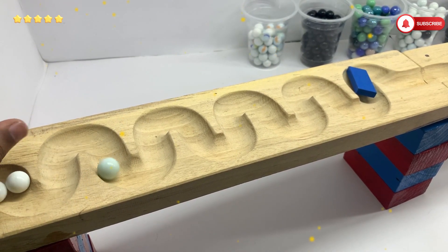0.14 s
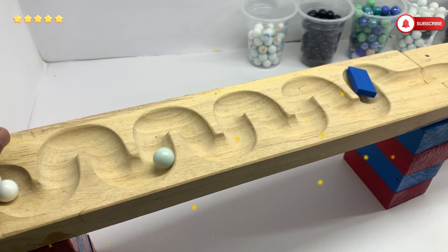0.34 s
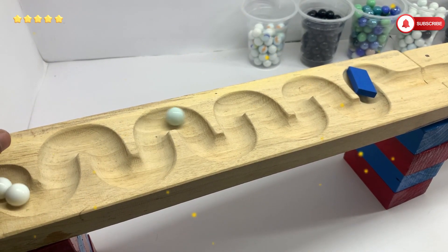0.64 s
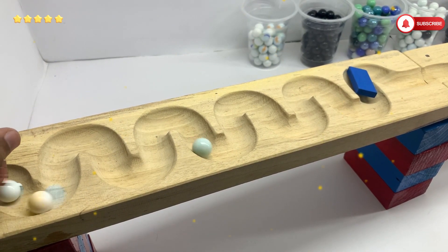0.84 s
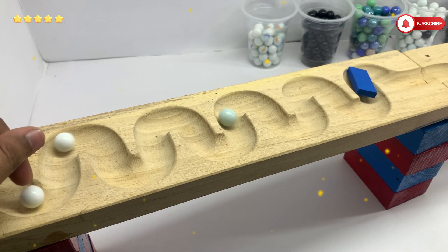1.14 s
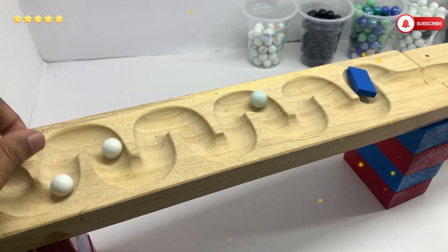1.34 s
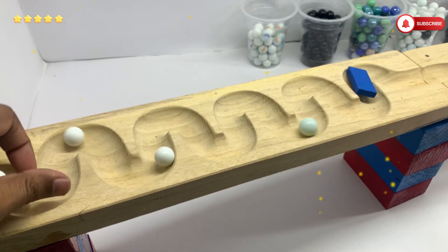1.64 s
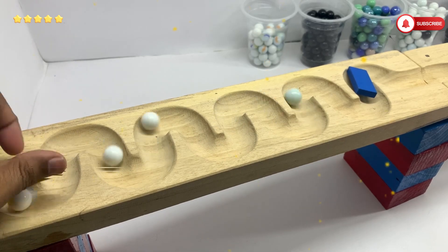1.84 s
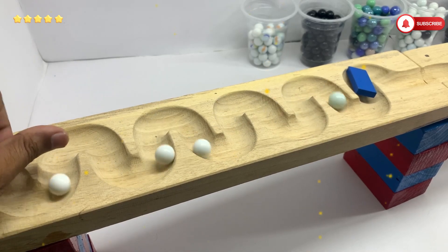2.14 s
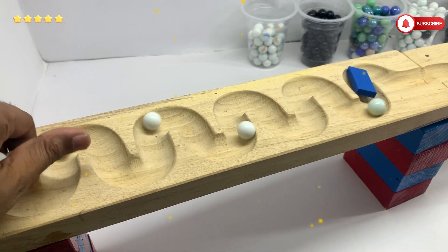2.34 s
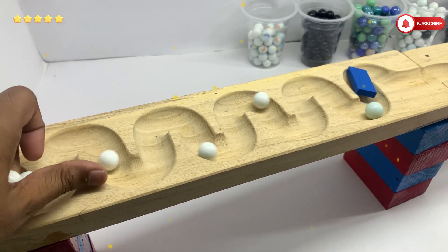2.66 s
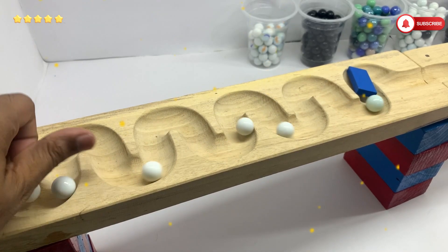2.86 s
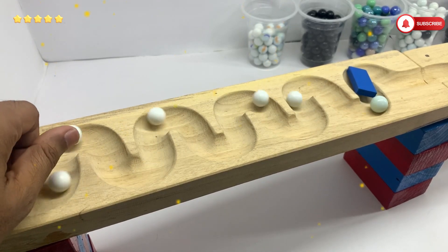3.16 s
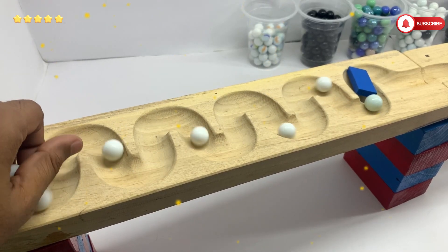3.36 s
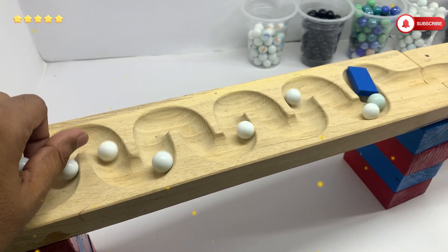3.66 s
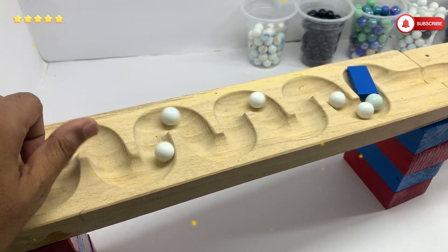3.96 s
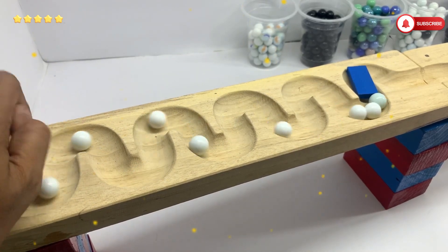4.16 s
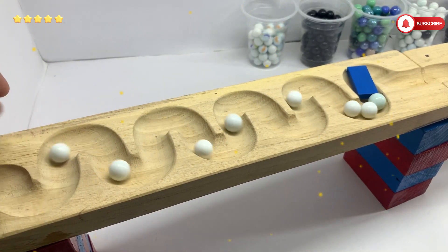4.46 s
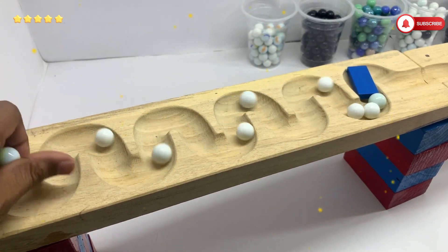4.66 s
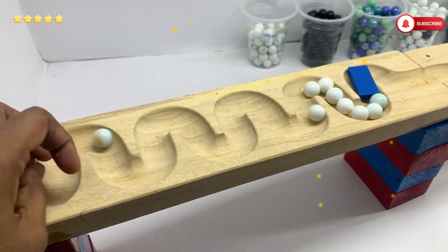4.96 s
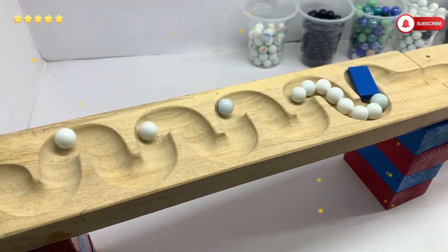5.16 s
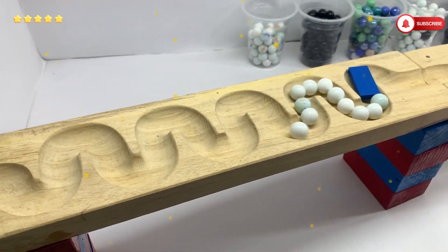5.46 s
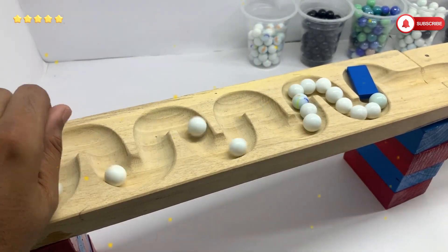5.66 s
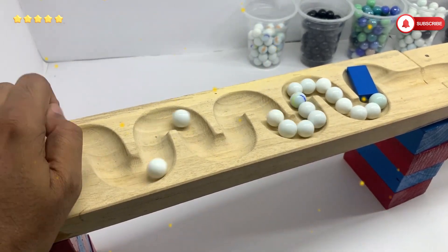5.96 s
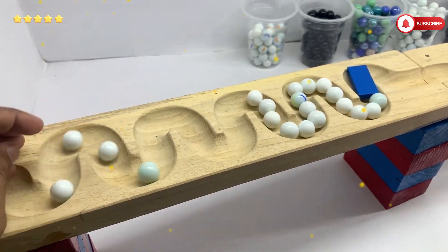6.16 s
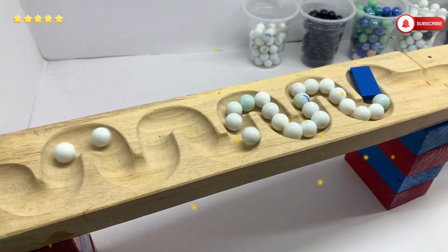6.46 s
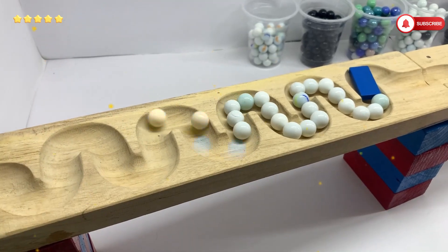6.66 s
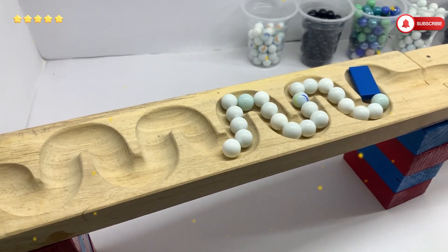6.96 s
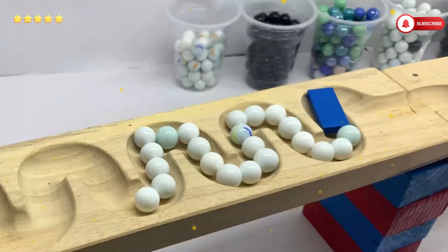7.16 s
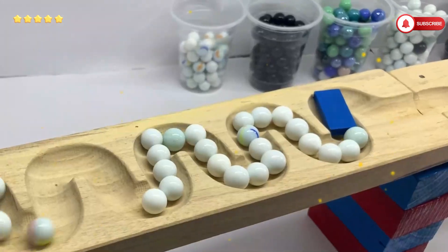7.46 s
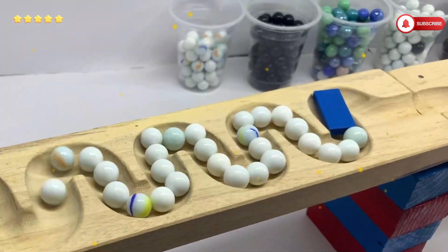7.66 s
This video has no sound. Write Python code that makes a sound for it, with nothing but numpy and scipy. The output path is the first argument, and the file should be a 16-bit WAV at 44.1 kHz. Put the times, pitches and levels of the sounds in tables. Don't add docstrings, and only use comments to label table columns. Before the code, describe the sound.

Close indoor rolling of glass marbles on a ringing wooden plank, bumping bends and clacking together, abruptly turning into fast, thin, crowded clicking.

```python
import sys
import numpy as np
from scipy import signal
from scipy.fft import rfft, irfft
from scipy.io import wavfile
from scipy.ndimage import uniform_filter1d

SR = 44100
rng = np.random.default_rng(int(sys.argv[2]) if len(sys.argv) > 2 else 0)


def field_ratio(decibels):
    return 10 ** (np.asarray(decibels, dtype=float) / 20)


def wav_record(signal):
    frames = np.transpose(np.atleast_2d(signal))
    bounded = np.clip(frames, -1, 1)
    quanta = np.round(bounded * 32767).astype(np.int16)
    wavfile.write(sys.argv[1], SR, quanta)


N = 344348

HURRY_S, SECOND_HURRY_S = 4.725, 5.535
EARLY_SPEEDUP, SPEEDUP = 3.45, 2.96
WANDER_DB = 2.6

# (pitch [Hz], width [Hz], level [dB])
RUMBLE = [(58, 25, -11), (93.5, 5.7, 0), (133.3, 104, 1.5), (170.7, 18.4, 3), (223.6, 33, -2.5),
          (262, 39, 1.5), (327.3, 40, -2)]
# (pitch [Hz], width [Hz], level [dB])
BODY = [(508, 25, -1.5), (620, 86, 0.5), (839, 49, -1.2), (955.3, 46, -1.4), (1083, 83, -6),
        (1231, 96, -1.3), (1400, 85, -0.5), (1565, 22, 2)]
# (pitch [Hz], width [Hz], level [dB])
RING = [(1971, 80, 2.5), (2176, 38, 2.5), (2353, 75, -1), (2536, 51, -4)]
# (pitch [Hz], width [Hz], level [dB])
SHEEN = [(2940, 72, 7), (3250, 30, 0), (3640, 60, -6), (3850, 72, -7), (4040, 36, -5), (4520, 60, -6),
         (5100, 45, -7)]
SHOT_ENDS_S = [
    .545,
    1.612,
    2.742,
    3.67,
    4.74,
    6.735,
    7.178,
    7.328,
    8,
]
# (time [s], peak [dB], lower part [dB])
FAST_CLICKS = [(4.7125, -12, -19), (4.7177, -12, -22), (4.7253, -8, -23), (4.7667, -10.5, -8),
               (4.8043, -13.5, -7), (4.8289, -3, -8), (4.883, -13.5, -10), (4.9166, -7.5, -6.5),
               (4.9483, -21, 5), (4.949, -19.5, -7), (4.9676, -20, -3), (5.0067, -2, -25),
               (5.0496, -17.5, -5), (5.1005, -26, 2), (5.1586, -9, -16), (5.1773, 1, -23),
               (5.2756, -9.5, -1), (5.3423, -14, -4), (5.348, -9, -6), (5.3833, -3.5, -2.5),
               (5.4316, -3, -6), (5.4617, -12, -19), (5.4896, -23, -5), (5.504, -15, -12),
               (5.5146, -9, -26), (5.5315, -12, -25), (5.5315, -3, -31), (5.5963, -3.5, -16),
               (5.628, -3, -16.5), (5.6566, -4, -15), (5.6929, -6.5, -7), (5.727, -0.5, -20),
               (5.789, -2.5, -9.5), (5.8198, -13, -5), (5.8205, -6, -7), (5.8388, -6, -16),
               (5.8542, -2, -23), (5.9175, -7, -5.5), (5.959, -7, -8), (5.967, -15, -13), (5.967, -5, -26),
               (5.99, -6, -19), (6.0406, -24, 2.5), (6.078, -6, -11), (6.0997, -8, -9), (6.106, -6, -12),
               (6.1237, -12, -15), (6.1303, -7, -20)]
# (time [s], peak [dB], lower part [dB])
LAST_CLICKS = [(6.1735, -13, -11), (6.1912, -10, -13), (6.239, -12, -5), (6.2677, -2.5, -5.5),
               (6.329, -4, -32), (6.3853, -17, -5), (6.3853, -2, -15), (6.4137, -3, -9), (6.4466, -8, 0),
               (6.4792, -3, -5), (6.5007, -5, 0), (6.568, -6, -14), (6.6493, -3, -8), (6.6868, -2.5, -8),
               (6.716, -4.5, -20), (6.7673, -19, -31), (6.8123, -30, -14), (6.8123, -14, -38.5),
               (6.8622, -27, -15), (6.8782, -2.5, -19), (6.932, -20, -10), (6.95, -23, -13),
               (6.9985, -25, 1), (7.0303, -15, -0.5), (7.08, -1.5, -18), (7.1226, -5, -29),
               (7.1413, -3.5, -20), (7.1675, -11, -10), (7.1675, -1.5, -12.5), (7.2101, 2, -25),
               (7.2508, -3, -17), (7.2688, -7, -22), (7.297, -21, -20), (7.295, -3.5, -16),
               (7.3467, 0, -25), (7.374, 3, -27), (7.4329, -24, 5), (7.432, -12, -12), (7.4569, -14, -4),
               (7.4707, -7, -16), (7.5107, -10, -5), (7.5584, -7.5, -5), (7.5888, -9, -4),
               (7.6107, -12, -10), (7.623, -3.5, -10), (7.6656, -13, -12), (7.6762, -12, -17),
               (7.7122, -7.5, -8), (7.7514, -11.5, -18)]


def unit(x):
    return x / np.sqrt(np.mean(x ** 2))


def colour(x, spectrum, extra_db=0):
    hz, db = np.transpose(spectrum)
    bins = np.fft.rfftfreq(x.shape[-1], 1 / SR)
    gain_db = np.interp(np.log(bins + 1), np.log(hz), db, left=-90, right=-90)
    return irfft(rfft(x) * field_ratio(gain_db + extra_db), x.shape[-1])


def walk(size, rate):
    hold = int(SR / rate)
    values = rng.standard_normal(size // hold + 1)
    return 2.13 * uniform_filter1d(np.repeat(values, hold), hold)[:size]


def together(*levels_db):
    return 10 * np.log10(sum(field_ratio(db) ** 2 for db in levels_db) + 1e-9)


def stepped(levels, first, last):
    t = np.arange(first, last) / SR
    return [np.interp(t, t[::44], db) for db in levels(t[::44])]


def within(table, first, last):
    return np.transpose([row for row in table if first <= row[0] * SR < last])


def room_hum():
    spectrum = [(20, -12), (60, -9), (200, -5), (400, -24)]  # (Hz, dB)
    return unit(colour(rng.standard_normal((2, N)), spectrum)) * field_ratio(-53)


def chop(t):
    since = t - np.take([-1] + SHOT_ENDS_S, np.searchsorted(SHOT_ENDS_S, t, "right"))
    return field_ratio(-15 * np.exp(-since / 0.022))


def clicks(table, spectrum, split_hz, rise_s, crack_s, tail_s, tail_db, alike, gain_db, ping_db, size):
    out = np.zeros((2, N + size))
    t, bins = np.arange(size) / SR, np.fft.rfftfreq(size, 1 / SR)
    shape = (1 - np.exp(-t / rise_s)) * (np.exp(-t / crack_s) + field_ratio(tail_db) * np.exp(-t / tail_s))
    for s, db, low_db in table:
        noise = rng.standard_normal((3, size))
        ping_hz = split_hz * rng.uniform(.6, 2.2, (8, 1))
        pings = field_ratio(ping_db) * np.sin(2 * np.pi * ping_hz * t).sum(axis=0)
        tilt_db = low_db / (1 + (bins / split_hz) ** 6)
        pair = colour(alike * noise[0] + pings + noise[1:], spectrum, tilt_db)
        pair = pair / np.std(colour(noise[0], spectrum)) * shape
        pan_db = noise[0, 0]
        i = int(s * SR)
        out[:, i:i + size] += pair * field_ratio(db + gain_db + np.array([[pan_db], [-pan_db]]))
    return out[:, :N]


def slow_glass():
    # (time [s], peak [dB], lower part [dB])
    clack_table = [(.0466, -4, 17), (.12, 0, -15), (.2997, 0.5, 4.5), (.4382, -2.5, -5), (.5138, -10, 16.5),
                   (1.231, -9.5, 7), (1.588, -7.5, 18), (1.6046, -2, 18), (1.6845, -13.5, 24),
                   (2.169, -16.5, 15), (2.4009, -11.5, 15), (2.6562, 0.5, 5), (2.7543, -5, 17.5),
                   (2.848, -6, 13), (2.9173, -5.5, 18.5), (3.31, -6.5, 15), (3.3684, -12, 24),
                   (3.963, -10, 8), (4.0105, -4.5, 2), (4.0248, -3.5, 20.5), (4.369, -11, 4),
                   (4.7168, 1, 1)]
    # (time [s], peak [dB])
    tick_table = [(0.019, 0), (0.292, 11), (0.54, 2.5), (2.796, 7), (3.236, 4), (3.32, 6.5), (3.666, 6),
                  (3.7078, 2.5), (4.0984, 6), (4.4691, 2.5), (4.7037, -9)]
    # (time [s], peak [dB])
    faint_table = [(0.0872, -17), (0.2688, -21), (0.5594, -13), (0.6185, -21), (0.65, -14), (0.7592, -32),
                   (0.994, -27), (1.4197, -28), (1.724, -23), (1.7744, -32), (1.8126, -19), (2.0901, -32),
                   (2.2872, -25), (2.3875, -26), (2.4833, -22), (2.503, -19), (2.542, -36), (2.7355, -16),
                   (2.8544, -20), (2.9985, -19), (3.2186, -17), (3.936, -25), (4.348, -19), (4.535, -13.5)]
    # (frequency [Hz], level [dB])
    glass_colour = [(2500, 1.5), (3500, -1.5), (6000, 3.5), (7500, -5.5), (9300, 3.5), (11000, -13),
                    (14500, -16), (16000, -42)]
    bright = [(s, db, -25) for s, db in tick_table]
    faint = [(s, db + 5, -5.5) for s, db in faint_table]
    return clicks(clack_table + bright + faint, glass_colour, split_hz=4840, rise_s=0.0018,
                  crack_s=0.0031, tail_s=0.037, tail_db=-20.0, alike=0.26, gain_db=-6.5,
                  ping_db=-16.5, size=8192)


def fast_glass():
    # (frequency [Hz], level [dB])
    glass_colour = [(1100, 8), (4500, 2), (8000, -4.5), (10800, -2), (11800, 0), (13100, 8.5), (15300, 1),
                    (16300, -36)]
    hurried = [(s, db, low_db + 2.5) for s, db, low_db in FAST_CLICKS + LAST_CLICKS]
    return clicks(hurried, glass_colour, split_hz=5500, rise_s=0.00082, crack_s=0.00088,
                  tail_s=0.0084, tail_db=-16.5, alike=1.37, gain_db=4.7, ping_db=-8, size=2048)


def bumps(size, per_s, spread_db):
    hit = rng.random(size) < per_s / SR
    return hit * rng.standard_normal(size) * field_ratio(spread_db * np.minimum(rng.exponential(1, size), 3.5))


def rattle(size, speed):
    fade = np.exp(-speed / (0.003 * SR))
    taps = signal.lfilter([1], [1, -fade], np.abs(bumps(size, 70 * speed, 4.2)))
    return unit(bumps(size, 1500 * speed, 2.5) * (1 + .28 * taps))


def hiss(spectrum, jolts, level_db, grit, flicker_db, alike):
    grains = signal.lfilter([1], [1, -.9], np.abs(jolts))
    mid, side = rng.standard_normal((2, len(jolts))) * (1 + grit * unit(grains))
    pair = unit(colour(np.array([mid * alike + side, mid * alike - side]), spectrum))
    split_hz = spectrum[len(spectrum) // 2][0]
    low = signal.sosfilt(signal.butter(2, split_hz, fs=SR, output="sos"), pair)
    low_db = level_db + flicker_db * walk(len(jolts), 70)
    high_db = level_db + flicker_db * walk(len(jolts), 70)
    return low * field_ratio(low_db) + (pair - low) * field_ratio(high_db)


def rolls(t, table, level_db, speed=1):
    stop_s = 60 / 413 / speed
    levels = []
    for (go, full, stop, *_), db in zip(table, level_db):
        levels.append(db + np.interp(t, [go - .02, go, full, stop, stop + stop_s], [-60, -14, 0, 0, -60]))
    return together(*levels)


def skitters(t, table, level_db, fade_db_per_s):
    ends = np.take(SHOT_ENDS_S, np.searchsorted(SHOT_ENDS_S, np.transpose(table)[0], "right"))
    levels = []
    for (s, hold, *_), db, end in zip(table, level_db, ends):
        fading_db = db - fade_db_per_s * np.maximum(t - s - hold, 0)
        levels.append(np.where((t >= s) & (t < end), fading_db, -99))
    return together(*levels)


def slow_levels(t):
    # (let go [s], full speed [s], stopped [s], level [dB], weight in the bass [dB])
    roll_table = [(-.1, 0, .17, -26, -2.5), (0.16, 0.234, .31, -22, 1), (0.332, 0.497, 0.53, -21, 8),
                  (0.57, 0.646, 0.7, -19, 2), (0.735, 0.78, 0.88, -19.5, 4.5), (.8, 0.944, 1.03, -18, 6.5),
                  (0.995, 1.17, 1.238, -15, 1.5), (1.21, 1.265, 1.425, -15.5, -4.5),
                  (1.407, 1.495, 1.62, -19.5, 5.5), (1.626, 1.784, 1.835, -17.5, 0.5),
                  (1.834, 1.908, 2.15, -13, -3), (2.104, 2.2, 2.364, -16.5, 2),
                  (2.313, 2.405, 2.577, -15.5, -4.5), (2.575, 2.613, 2.78, -15, -2.5),
                  (2.735, 2.981, 2.96, -23.5, 0), (2.91, 3.101, 3.32, -13.5, -2),
                  (3.337, 3.35, 3.47, -20.5, -2), (3.42, 3.496, 3.69, -14, 0.5), (3.58, 3.61, 3.4, -27, -6),
                  (3.691, 3.77, 3.9, -20, 0), (3.8, 3.84, 4, -21, -7), (3.973, 3.987, 4.39, -26, -1.5),
                  (4.132, 4.239, 4.42, -13.5, -1.5), (4.453, 4.577, 4.78, -14.5, -1)]
    # (time [s], hold [s], ring [dB], hiss [dB])
    skitter_table = [(0, 0.014, -20.5, -25.5), (0.044, 0.13, -18.5, -45), (1.31, 0.14, -25.5, -53),
                     (1.612, 0.022, -9.5, -21.5), (1.621, 0.21, -19.5, -49), (2.535, 0.064, -22, -52),
                     (2.734, 0.29, -8, -50), (2.791, 0.016, -11, -18), (3.21, 0.031, -21.5, -40),
                     (3.34, 0.11, -17, -55), (3.585, 0.085, -19.5, -52), (3.726, 0.039, -48, -33),
                     (4.018, 0.088, -20, -28), (4.385, 0.011, -16, -48), (4.62, 0.091, -29.5, -48)]
    *_, db, weight_db = np.transpose(roll_table)
    *_, ring_db, hiss_db = np.transpose(skitter_table)
    rumble_db, body_db = rolls(t, roll_table, db + weight_db), rolls(t, roll_table, db)
    light_db = skitters(t, skitter_table, ring_db, fade_db_per_s=146)
    light_hiss_db = skitters(t, skitter_table, hiss_db, fade_db_per_s=124)
    return (rumble_db, body_db,
            together(body_db - 7.5, light_db),
            together(body_db - 26, light_db - 6),
            together(body_db - 25, light_hiss_db, -47))


def fast_levels(t):
    # (let go [s], full speed [s], stopped [s], level [dB], weight in the bass [dB])
    roll_table = [(4.7, 4.723, 4.94, -32, 3), (4.772, 4.824, 4.73, -22, 0), (4.86, 4.88, 5.04, -41, 2),
                  (4.996, 5.116, 5.25, -29, 0.5), (5.132, 5.2, 5.35, -21.5, -4.5),
                  (5.284, 5.34, 5.52, -22.5, -2.5), (5.419, 5.466, 5.5, -25.5, 5.5),
                  (5.519, 5.546, 6.4, -38, -10), (5.566, 5.82, 5.83, -24.5, -2),
                  (5.83, 5.933, 5.94, -28.5, -2), (5.996, 6.078, 6.09, -27, 0.5),
                  (6.147, 6.207, 6.32, -22, -3), (6.268, 6.273, 6.37, -26, -3),
                  (6.363, 6.506, 6.6, -24.5, -1.5), (6.568, 6.634, 6.705, -25, 0.5),
                  (6.73, 6.75, 7.03, -47, 10.5), (6.89, 7.03, 7.08, -34, 8.5),
                  (7.11, 7.173, 7.11, -25.5, -8), (7.204, 7.215, 7.2, -35, -10),
                  (7.248, 7.288, 7.37, -28, -2), (7.345, 7.366, 7.9, -34, -3),
                  (7.412, 7.479, 7.71, -20, -5), (7.61, 7.676, 7.6, -33, 3),
                  (7.716, 7.755, 7.76, -39.5, 10.5)]
    # (time [s], hold [s], hiss [dB])
    skitter_table = [
        (4.743, 0.12, -25),
        (5.16, 0.053, -29),
        (5.505, .03, -29),
        (5.582, 0.11, -35),
        (6.796, 0.12, -32),
        (7.265, 0.021, -21.5),
    ]
    # (let go [s], full speed [s], stopped [s], level [dB])
    singing_table = [
        (4.74, 4.8, 5.7, -42.5),
        (5.055, 5.149, 5.46, -32),
        (5.55, 5.8, 5.8, -31),
        (5.86, 5.93, 6.3, -44),
        (6.108, 6.24, 5.7, -33.5),
        (6.3, 6.51, 6.95, -33.5),
        (6.623, 6.907, 7.08, -22),
        (7.314, 7.503, 8.4, -27.5),
        (7.692, 7.79, 8.8, -24),
    ]
    *_, db, weight_db = np.transpose(roll_table)
    roll_hiss_db = rolls(t, roll_table, db + 1 - 0.26 * weight_db, 2.2)
    light_hiss_db = skitters(t, skitter_table, np.transpose(skitter_table)[-1], fade_db_per_s=306)
    tone_db = rolls(t, singing_table, np.transpose(singing_table)[-1], 9.3)
    return (rolls(t, roll_table, db + weight_db, 3.1), rolls(t, roll_table, db, 1.26),
            together(roll_hiss_db, light_hiss_db), together(tone_db, -44.5))


def ring(force, hz, width, turn):
    decay = np.exp((2j * np.pi * hz - np.pi * width) / SR)
    z = signal.lfilter([np.sqrt(width)], [1, -decay], force)
    return np.array([(z * np.exp(1j * turn)).imag, (z * np.exp(-1j * turn)).imag])


def plank(modes, band_hz, speed, jolts, roll_db, at, knock_db, wander_db, alike_hz, damping, dense_db,
          apart, slap_db):
    size, out = len(jolts), 0
    total = sum(field_ratio(db) ** 2 for _, _, db in modes)
    peak = np.sqrt(sum(field_ratio(db) ** 2 * width * speed * damping for _, width, db in modes))
    blows, keep = np.zeros(size), np.exp(-speed / (0.0093 * SR))
    blows[at] = field_ratio(knock_db)
    chatter = signal.lfilter([1], [1, -keep], blows) * rng.standard_normal((2, size))
    knock = (blows * 0.59 + chatter[0] * np.sqrt(1 - keep ** 2)) / peak
    for hz, width, db in modes:
        turn = rng.uniform(-1.236, 1) * min(hz * speed / alike_hz, np.pi / 2)
        shake = jolts + 0.68 * rng.standard_normal(size)
        shake = shake * field_ratio(roll_db + wander_db * walk(size, 10 * speed))
        force = shake * np.sqrt(2 * np.pi / SR / total) + knock
        out = out + field_ratio(db) * ring(force, hz * speed, width * speed * damping, turn)
    band = signal.butter(2, np.multiply(band_hz, speed), "band", fs=SR, output="sos")
    blur = jolts + apart * rng.standard_normal((2, size))
    dense = unit(signal.sosfilt(np.vstack([band, band]), blur))
    dense = dense * field_ratio(roll_db + dense_db + wander_db * walk(size, 30 * speed))
    slap = field_ratio(slap_db) * (chatter[0] + apart * chatter[1] * np.array([[1], [-1]]))
    return signal.sosfilt(band, out + slap) + dense


def reload(wood, band_hz, gain_db):
    group = signal.sosfiltfilt(signal.butter(2, band_hz, "band", fs=SR, output="sos"), wood)
    return wood + (field_ratio(gain_db) - 1) * group


def knock_notes(at, size, knock_db, pitch_hz, ring_s):
    out, t = np.zeros(size + 2048), np.arange(2048) / SR
    for i, db, hz in zip(at, knock_db, pitch_hz):
        out[i:i + len(t)] += field_ratio(db) * np.sin(2 * np.pi * hz * t) * np.exp(-t / ring_s)
    return out[:size]


def slow_run(last):
    # (time [s], peak [dB], thud [dB])
    thud_table = [(.2685, -0.5, -1.5), (0.4033, -14, 6.5), (0.4631, -2.5, 4), (0.759, -3.5, 5),
                  (1.0097, 2, -3), (1.0963, -7, 2), (1.348, -1, -19), (1.5745, -4, 3), (1.7251, 2.5, -11),
                  (1.941, -3, 0), (2.1077, -5, 1), (2.3005, -2, 6.5), (2.5405, 0.5, -3), (2.6284, 0.5, -4),
                  (2.8422, 0.5, -9), (3.3022, -2, 2), (3.346, -2, -1), (3.6458, -4, 3), (3.7518, -7.5, 1),
                  (3.8586, -7, 7), (3.8836, 1, -1), (3.9646, 3, -15), (4.2727, 2, -6), (4.603, -4, 5),
                  (4.6749, -3.5, 0)]
    tap_times = [.0502, .09, .69, .812, 1.13, 1.278, 1.3162, 1.42, 1.644, 1.685, 1.776, 1.848, 2.0443,
                 2.187, 2.3865, 2.7342, 2.757, 2.81, 2.9178, 3.1, 3.59, 3.936, 4.3486, 4.3973, 4.623]
    # (deepest notes [dB], upper body [dB])
    load_table = [
        (-1, -0.5),
        (-0.9, 1),
        (-0.9, 1.5),
        (-4.5, -0.4),
        (-4, 0),
    ]
    # (frequency [Hz], level [dB])
    hiss_colour = [(2500, -14), (2940, 5), (3800, -9.5), (5000, -7), (6500, -11.5), (7600, -17), (9300, -8),
                   (11500, -16), (14000, -16.5), (15500, -36)]
    rumble_db, body_db, ring_db, sheen_db, hiss_db = stepped(slow_levels, 0, last)
    shot = np.searchsorted(SHOT_ENDS_S, np.arange(last) / SR)
    deep_db, upper_db = np.transpose(load_table)[:, shot]
    s, knock_db, thud_db = np.transpose(thud_table + [(tap, 2.5, -12.5) for tap in tap_times])
    at, jolts = (s * SR).astype(int), rattle(last, 0.98)
    wood = plank(RUMBLE, (42, 450), 1.0, jolts, rumble_db + 1.0, at, knock_db + thud_db - 22,
                 wander_db=1.94, alike_hz=810, damping=0.88, dense_db=-12.0, apart=2.4, slap_db=-9)
    wood = reload(wood, (30, 120), deep_db)
    wood += plank(BODY, (380, 1800), 1, jolts, body_db + 0.56, at, knock_db + thud_db - 3.0,
                  WANDER_DB, alike_hz=850, damping=0.9, dense_db=-6.5, apart=1.08, slap_db=-3.3)
    wood = reload(wood, (1150, 1800), upper_db)
    wood += plank(RING, (1750, 2900), 0.97, jolts, ring_db + 0.22, at, knock_db - 3.0,
                  WANDER_DB, alike_hz=800, damping=0.64, dense_db=-8.5, apart=1.0, slap_db=-7.0)
    wood += plank(SHEEN, (2700, 5400), 0.99, jolts, sheen_db, at, knock_db - 23.5,
                  WANDER_DB, alike_hz=1500, damping=0.96, dense_db=-14.5, apart=0.37, slap_db=-27)
    wood = signal.sosfilt(signal.butter(2, 45, "high", fs=SR, output="sos"), wood)
    wood = wood * field_ratio([[-0.05], [0.05]])
    wood[1] = np.roll(wood[1], 8)
    return wood + hiss(hiss_colour, jolts, hiss_db, grit=0.17, flicker_db=1.0, alike=0.83)


def fast_run(first, last, speed):
    # (time [s], peak [dB], pitch [Hz])
    knock_table = [(4.8428, -2.5, 2270), (4.9163, 5.5, 1400), (4.9496, -0.5, 1500), (4.967, -4, 2310),
                   (5.106, 4, 2480), (5.1776, 1, 3450), (5.195, -3, 3400), (5.245, 4.5, 2120),
                   (5.28, 3, 3460), (5.295, -3, 3340), (5.3428, 0, 3550), (5.4076, 4, 3580),
                   (5.505, -4, 1020), (5.96, -3, 1340), (6.0778, -6, 3120), (6.237, 0, 1950),
                   (6.1882, -5, 2800), (6.3852, .3, 4600), (6.4142, -8, 4770), (6.4489, 4, 4200),
                   (6.4805, -3, 3430), (6.5055, -4, 4040), (6.5155, 4, 4067), (6.6486, -6, 2900),
                   (6.688, -4, 2940), (7.1235, -5, 2400), (7.1581, -5, 2820), (7.2103, -7, 1970),
                   (7.2525, -7, 2550), (7.288, -2.5, 2940), (7.3498, -0.5, 2800), (7.6757, -10, 3350),
                   (7.752, 1.5, 1920)]
    # (pitch [Hz], width [Hz], level [dB])
    note_table = [(302, 31, -7), (490.6, 3.8, -3), (1510, 180, -9.5)]
    # (frequency [Hz], level [dB])
    hiss_colour = [(2940, -61), (5000, -3), (5960, -3.5), (8580, 8.5), (9430, 3), (10500, 6.5), (11300, 6),
                   (13500, 6), (15900, -4), (16300, -49), (16500, -34)]
    rumble_db, body_db, hiss_db, tone_db = stepped(fast_levels, first, last)
    s, knock_db, pitch_hz = within(knock_table, first, last)
    at, jolts = (s * SR).astype(int) - first, rattle(last - first, speed)
    wood = plank(RUMBLE[1:], (80, 400), speed, jolts, rumble_db - 3, at, knock_db - 22.0,
                 WANDER_DB, alike_hz=2500, damping=0.49, dense_db=.1, apart=0.58, slap_db=-6)
    wood += plank(BODY, (400, 1600), speed, jolts, body_db - 0.2, at, knock_db - 10,
                  wander_db=2.85, alike_hz=2900, damping=2.0, dense_db=-0.91, apart=0.99, slap_db=0.24)
    notes = 0
    for hz, width, db in note_table:
        notes = notes + field_ratio(db) * unit(ring(jolts, hz * speed / SPEEDUP, width, turn=0.15))
    wood += notes * field_ratio(tone_db + 1.5)
    wood += knock_notes(at, last - first, knock_db - 9.0, pitch_hz, ring_s=0.0033)
    s, click_db, _ = within(FAST_CLICKS + LAST_CLICKS, first, last)
    click_at = (s * SR).astype(int) - first
    wood += plank(RING + SHEEN, (1750, 5300), speed, jolts, hiss_db - 6, click_at, click_db - 20.5,
                  wander_db=3.1, alike_hz=6000, damping=1.1, dense_db=-24, apart=1.0, slap_db=-22)
    wood = signal.sosfilt(signal.butter(4, 215, "high", fs=SR, output="sos"), wood)
    return wood + hiss(hiss_colour, jolts, hiss_db - 2.5, grit=0.53, flicker_db=3.5, alike=0.73)


def scene():
    hurry, second = int(HURRY_S * SR), int(SECOND_HURRY_S * SR)
    chopped = chop(np.arange(N) / SR)
    rolling = np.hstack([slow_run(hurry), fast_run(hurry, second, EARLY_SPEEDUP),
                         fast_run(second, N, SPEEDUP)])
    glass = slow_glass() + chopped * fast_glass()
    return rolling * chopped + glass + room_hum()


def roll_off(x):
    return signal.sosfilt(signal.butter(12, 16690, fs=SR, output="sos"), x)


def record(dry):
    mix = np.tanh(0.64 * dry) / 0.8
    return roll_off(mix)


dry = scene()
out = record(dry)
wav_record(out)
```